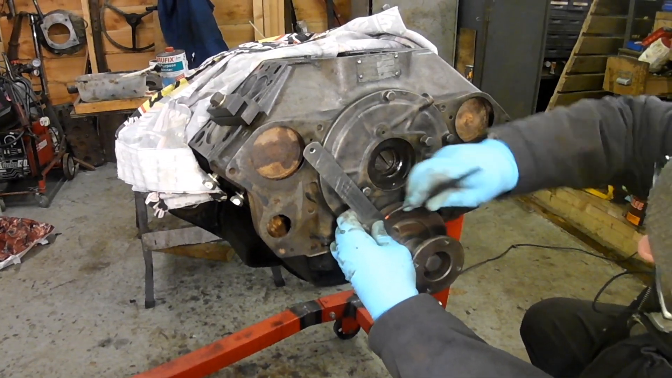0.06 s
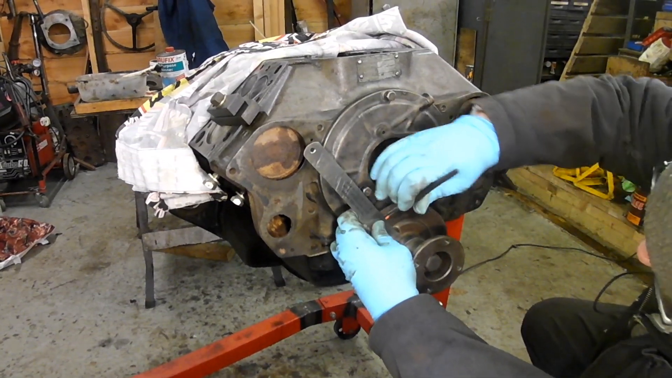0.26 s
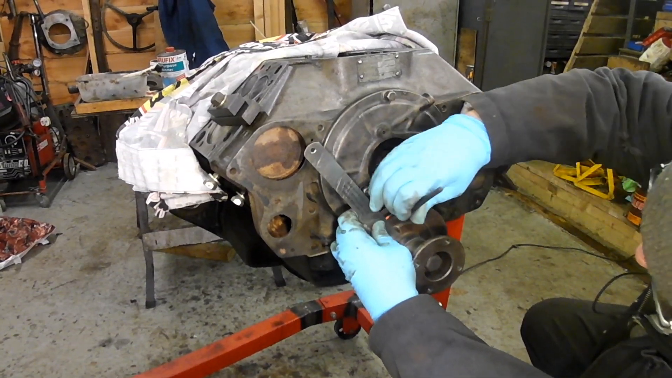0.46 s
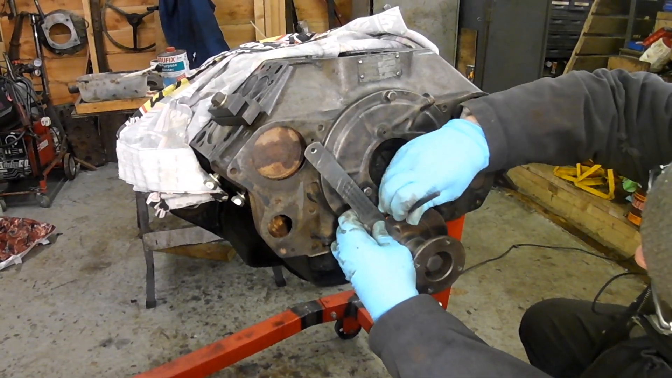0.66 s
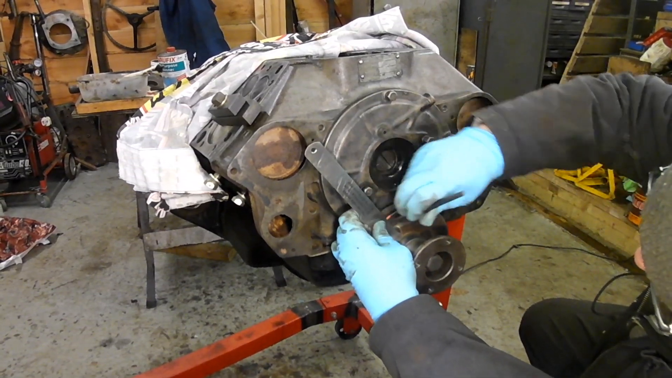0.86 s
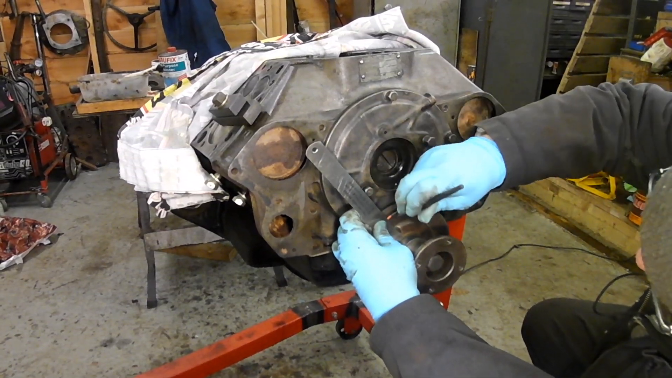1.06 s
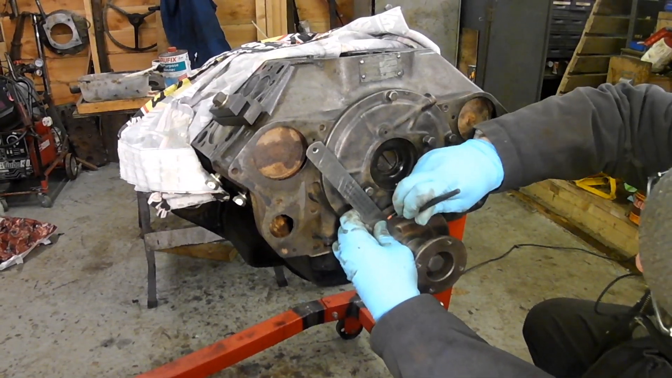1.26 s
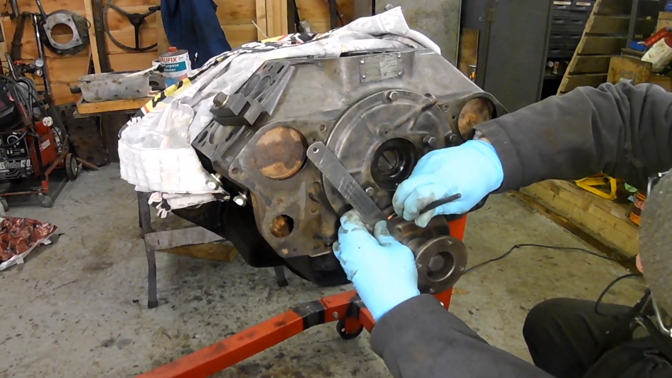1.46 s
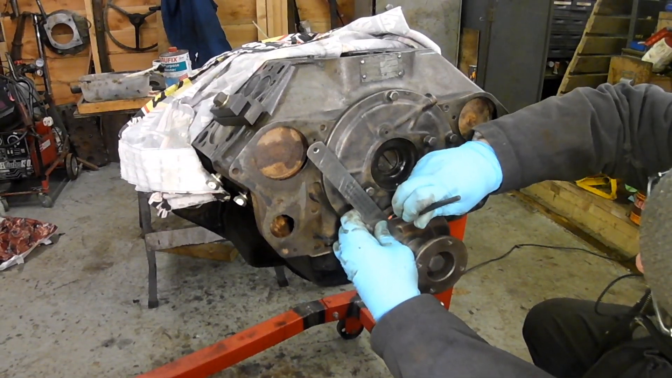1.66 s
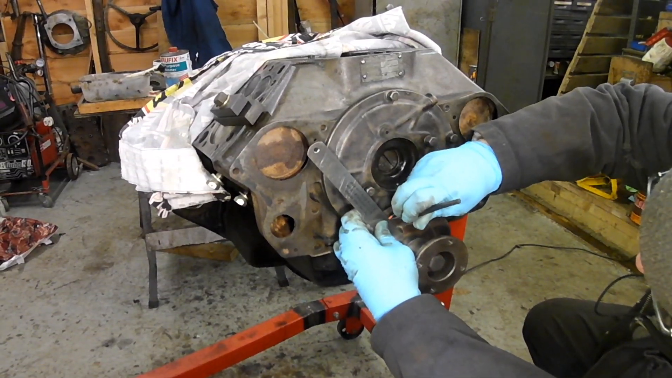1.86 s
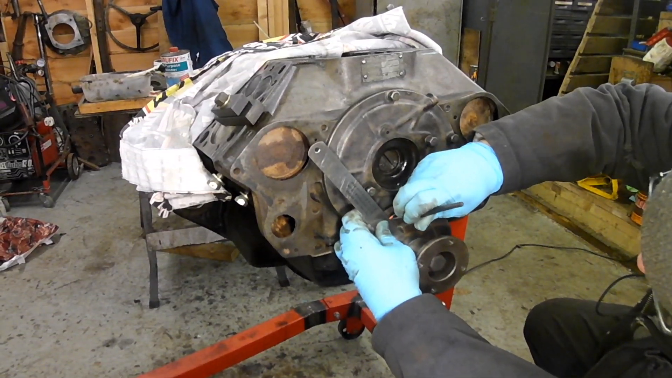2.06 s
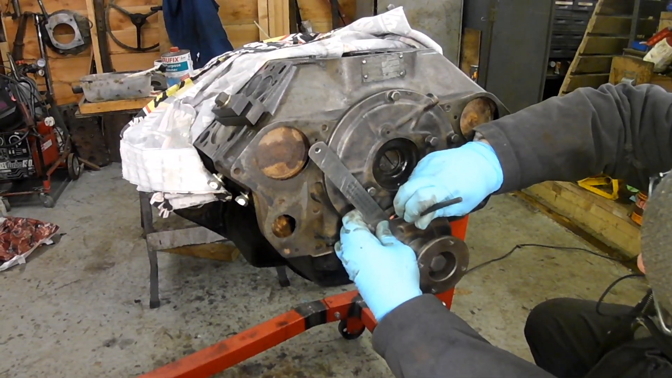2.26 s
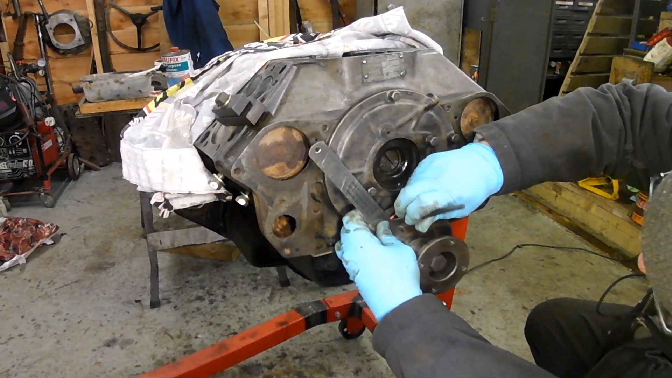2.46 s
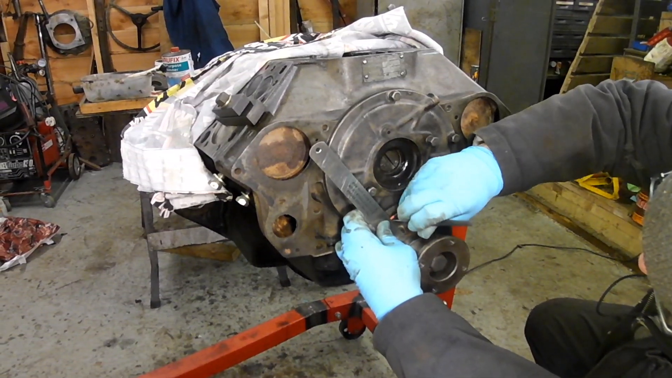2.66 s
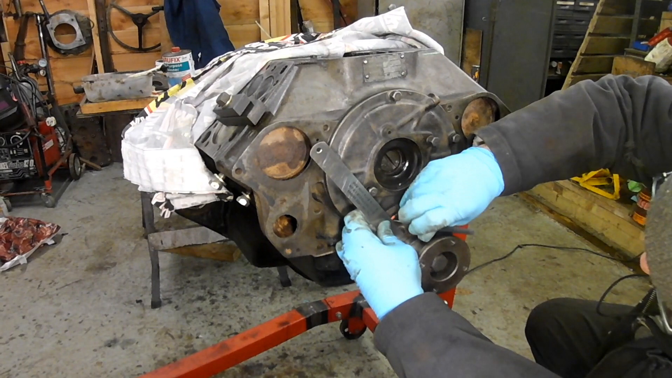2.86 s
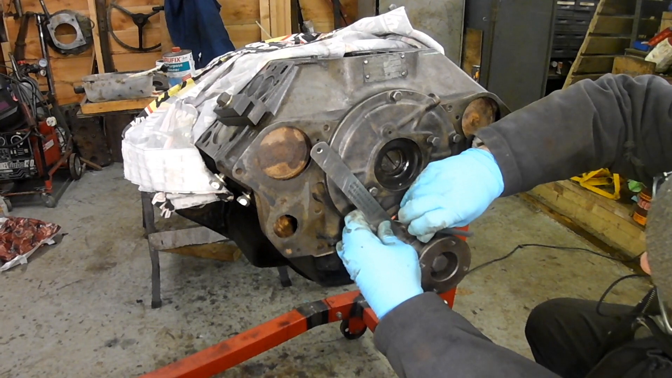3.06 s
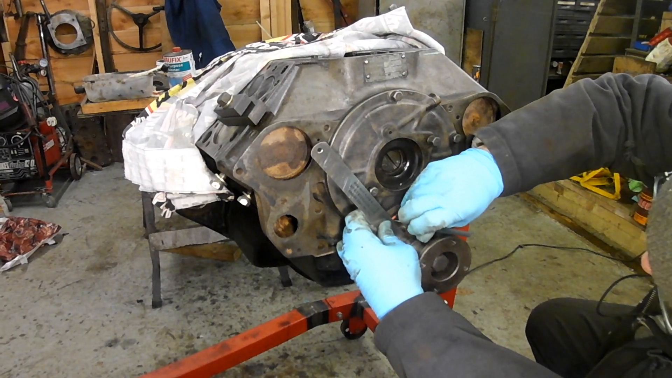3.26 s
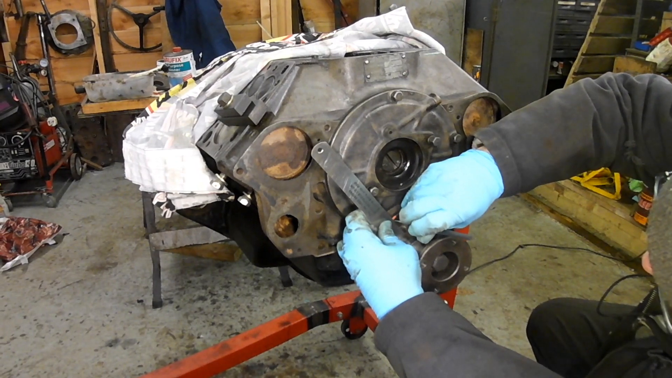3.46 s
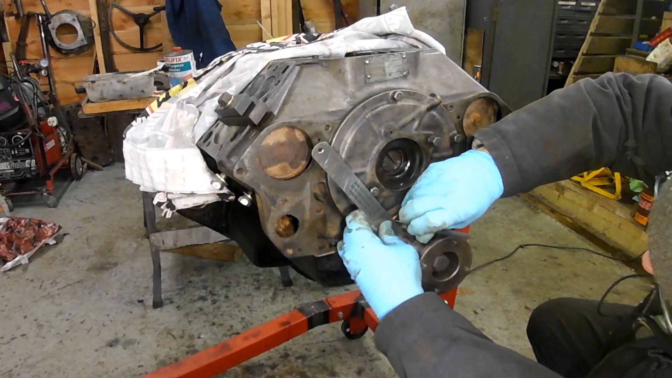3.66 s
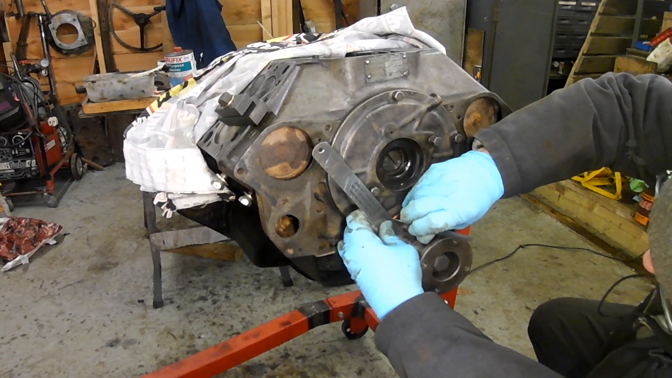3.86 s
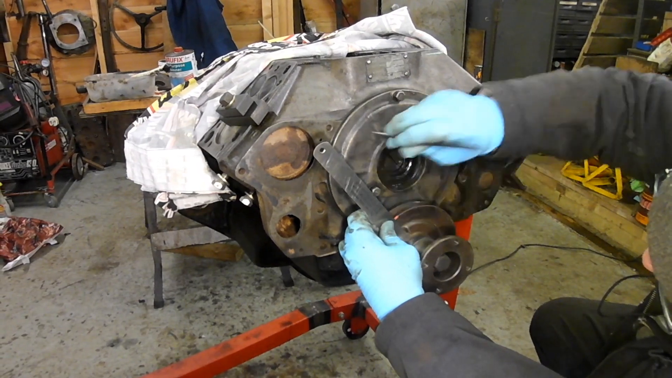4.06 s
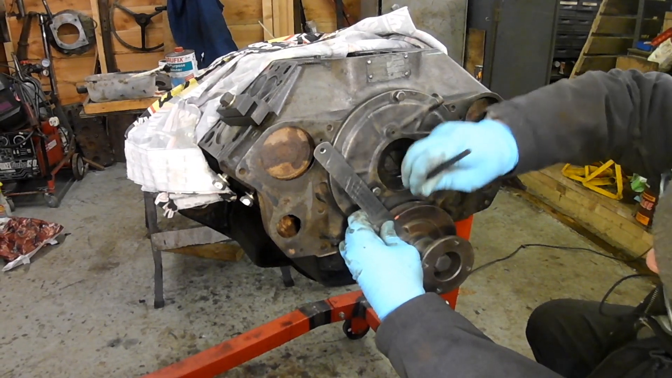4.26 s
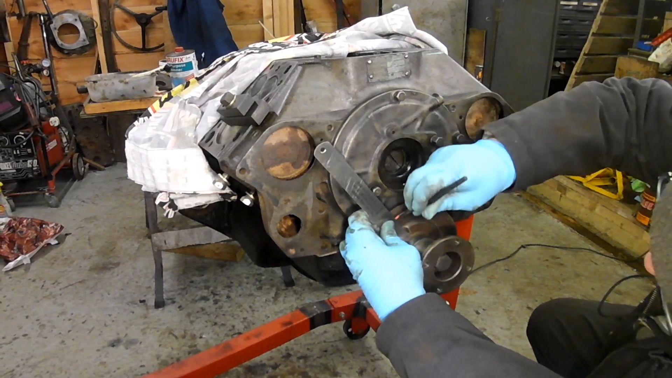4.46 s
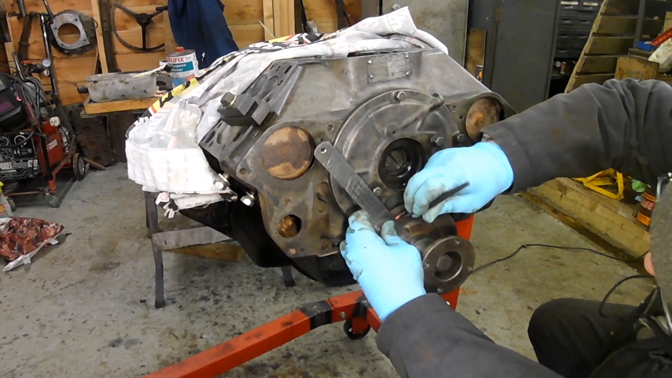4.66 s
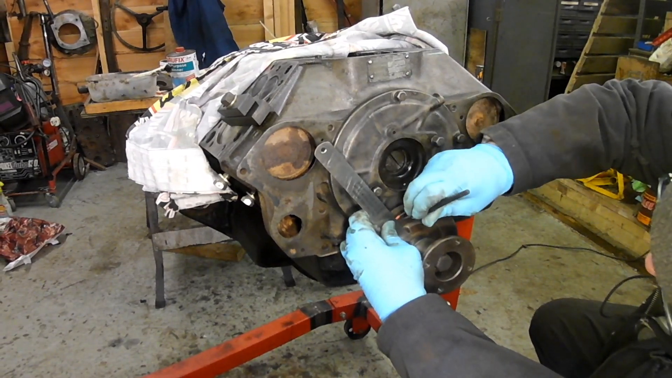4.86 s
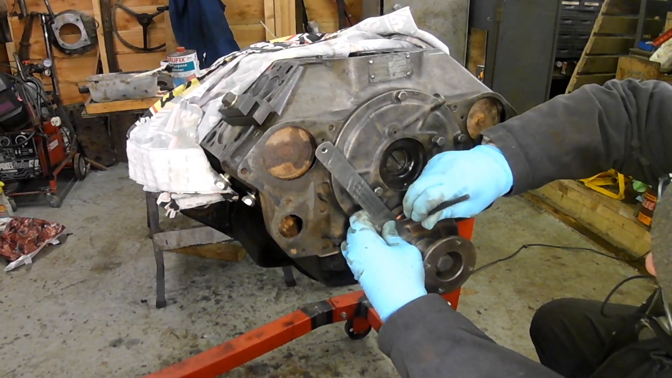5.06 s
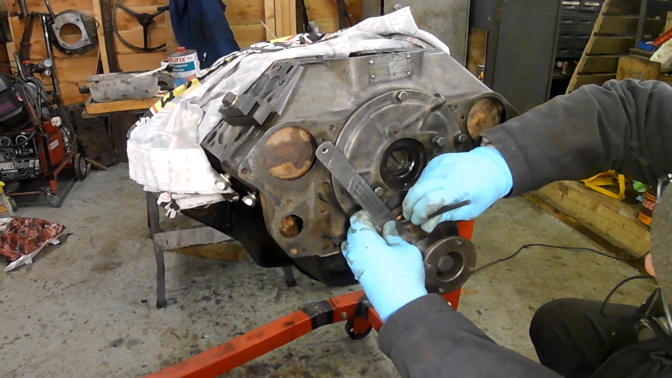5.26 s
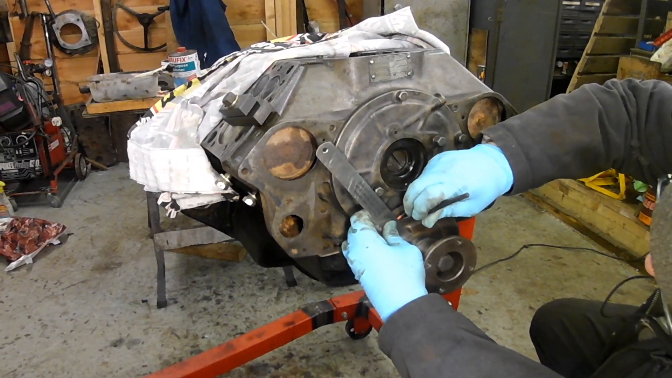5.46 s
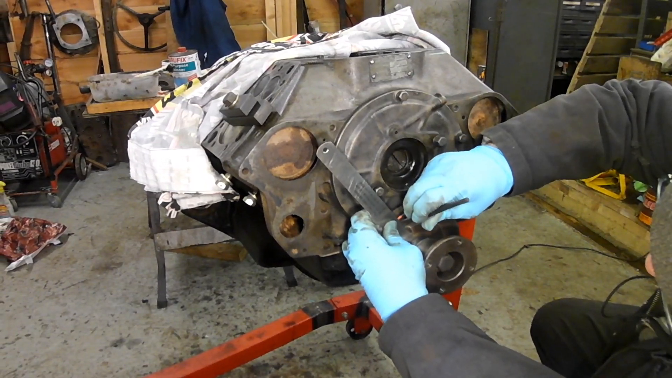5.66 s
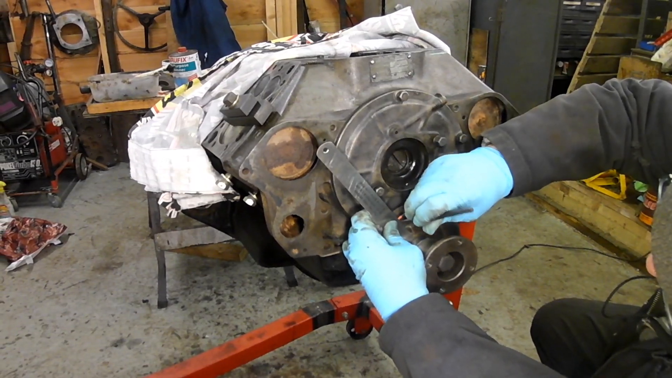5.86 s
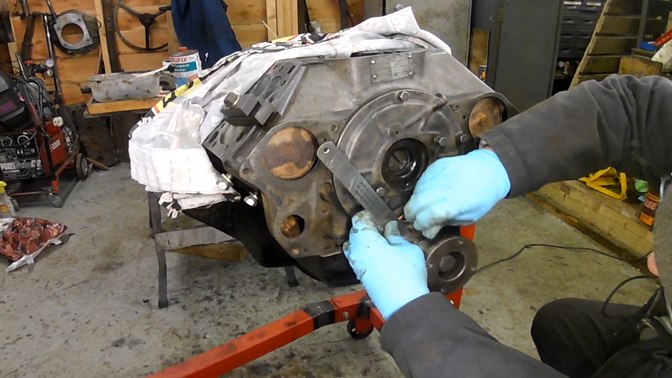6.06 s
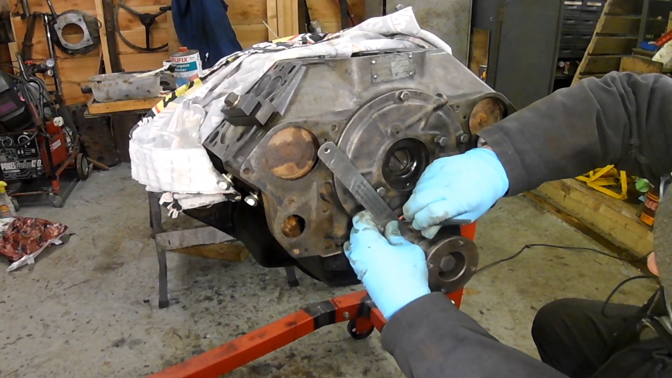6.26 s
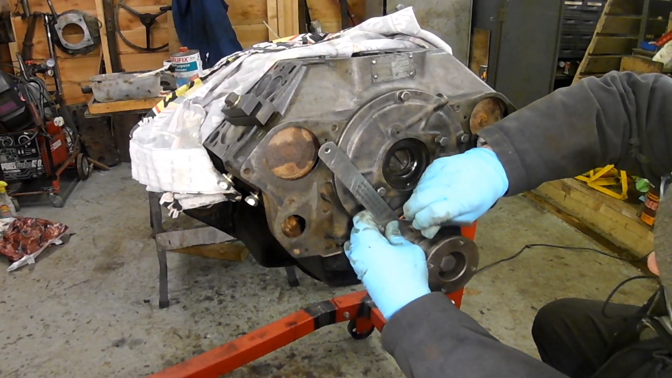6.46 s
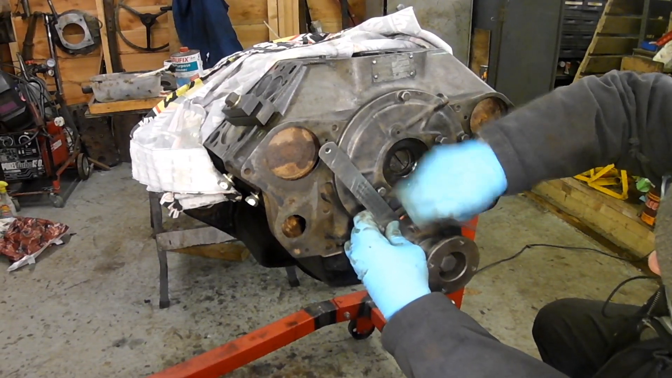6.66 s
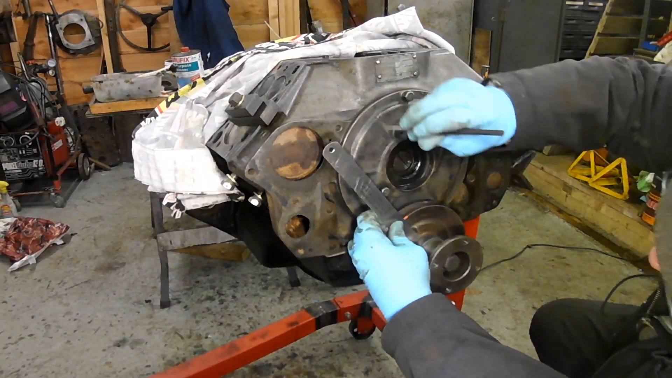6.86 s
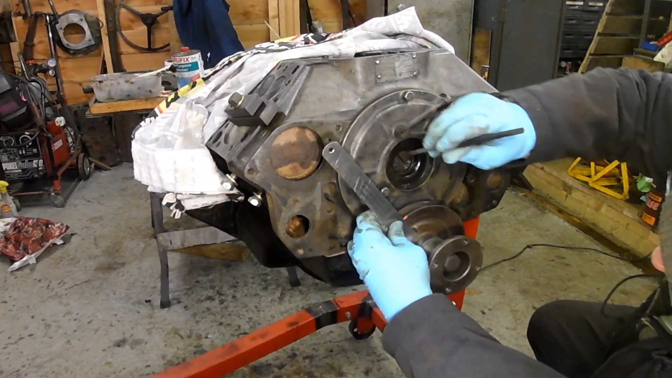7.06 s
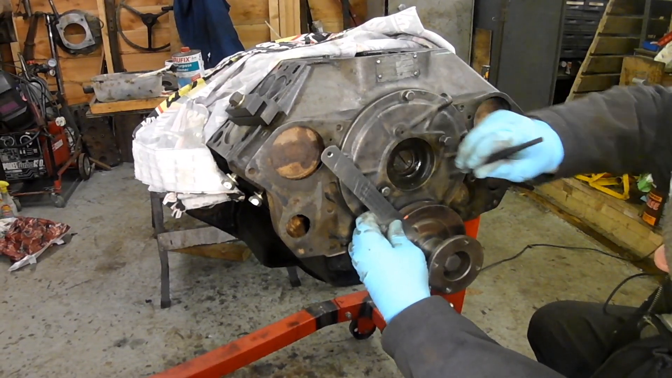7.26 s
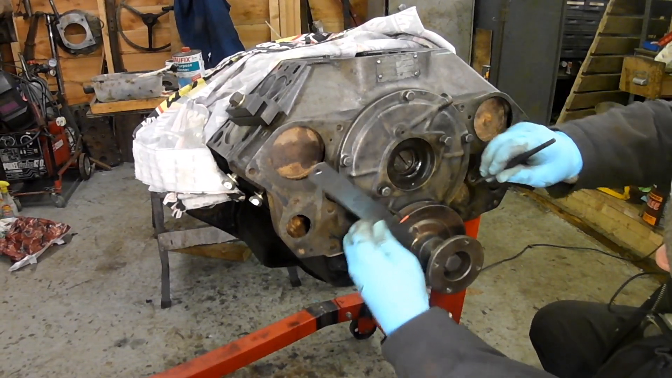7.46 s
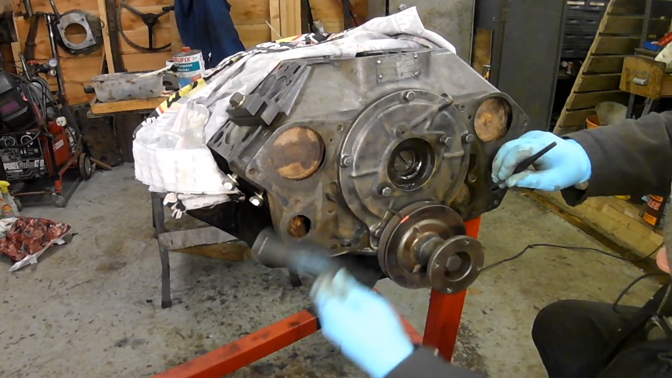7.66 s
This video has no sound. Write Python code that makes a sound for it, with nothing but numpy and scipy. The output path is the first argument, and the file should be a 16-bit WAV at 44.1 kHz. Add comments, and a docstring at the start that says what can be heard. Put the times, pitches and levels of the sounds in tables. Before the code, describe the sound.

A quiet small workshop, heard close, with barely audible low room air. From 0 to 1.7 seconds a steel tip makes two thin, high, faint hissing strokes along an engine pulley, with a little scratchy chatter near 0.8 and low sleeve rustle. From 2 to 3 seconds there are soft glove brushes and tiny ticks. A firmer scrape swells from 3 towards 4 seconds; a click at 3.8 leads to a loud, bright steel snap at 3.98, with short ringing, a muffled arm jerk and flapping sleeve. Cloth settles until about 5; small ticks come near 5.25, then another hissing stroke swells from 5.4 to 6.5. A crisp double click at 6.46 precedes a second sharp snap at 6.7 with a soft thud. Faint rubber squeaks follow near 6.9, then light scratches, tiny ticks and rustling until about 7.7.

```python
"""A steel pointer, held in gloved hands, scribes a mark on an engine pulley in a quiet workshop.
The sliding tip hisses and chatters through its resonances; sharp contacts ring the pointer and the pulley.
Twice the tip snaps off the edge and the arm jerks: a thud, a push of air and a flapping sleeve.
Sleeves rustle and rub, rubber gloves brush and squeak, and the small room answers the steel."""
import sys
import numpy as np
from scipy import signal
from scipy.fft import rfft, irfft, next_fast_len
from scipy.io import wavfile
from scipy.ndimage import map_coordinates

SR = 44100
rng = np.random.default_rng(int(sys.argv[2]) if len(sys.argv) > 2 else 0)


def digitize_waveform(pressure):
    """Quantize a signal to 16-bit integers and store it at the path in sys.argv[1].

    Rows of a 2-D input are taken as channels; values are limited to [-1, 1].
    """
    field = np.atleast_2d(pressure).T
    bounded = np.clip(field, -1, 1)
    quanta = np.round(bounded * 32767).astype(np.int16)
    wavfile.write(sys.argv[1], SR, quanta)


N = 340011

# All levels below are relative; later gains and filters set the final loudness.
# Strokes of steel along the pulley. Each row: start in seconds, firmest pressure in seconds,
# end in seconds, hiss level in dB, swell from the ends to the firmest pressure in dB.
STROKES = [(0, .25, 0.59, -66.5, 12), (.62, 1.1, 1.7, -67.5, 10), (2.983, 3.527, 3.99, -63.5, 13.5),
           (5.42, 6.125, 6.48, -62, 14)]
# Sharp contacts of the tip. Each row: time in seconds, level in dB, boost of the pinned-tip mode in dB,
# hardness (boost of the high modes) in dB, pulley ring in dB.
CLICKS = [(3.8055, -23.5, 15.5, -14, 2), (3.9227, -42, 19.5, -11.5, 9), (3.9762, -13, 6, 1.5, -2.5),
          (5.2455, -48.5, 27.5, 6, 3), (5.2777, -50, 28, 18, 10), (6.4555, -29.5, 15, 1, -25),
          (6.4599, -26, 6, -17, 2.5), (6.6961, -12.5, 0.5, 4.5, 2), (7.3274, -46.5, 19, 22.5, -1),
          (7.3677, -51, 17, 17, -9)]
# Short skids of the tip. Each row: peak time in seconds, level in dB, length (rise plus fall constants)
# in seconds, pitch of the main tip resonance in Hz.
SKIDS = [(0.731, -52, 0.013, 5130), (0.743, -46.5, 0.012, 5100), (0.749, -54, 0.005, 5000),
         (0.806, -52, .005, 5100), (.813, -44, 0.0068, 5400), (0.817, -42.5, 0.009, 5350),
         (2.178, -54.5, 0.0051, 4320), (2.624, -63.5, .008, 5150), (2.907, -54.5, .0025, 4900),
         (3.8031, -32.5, 0.0062, 5050), (5.121, -59.5, .009, 5150), (5.22, -64.5, 0.033, 5260),
         (5.2465, -46, 0.0043, 5200), (5.293, -51.5, 0.015, 5270), (6.456, -25, 0.007, 5180),
         (7.252, -56.5, 0.04, 5150), (7.321, -53, 0.023, 4660)]
# Gloves brushing the parts. Each row: peak time in seconds, level in dB, rise constant in seconds.
BRUSHES = [(.158, -66, .008), (.812, -56.5, 0.045), (1.303, -56, 0.0037), (1.436, -56, .001),
           (2.076, -56, .003), (2.136, -54.5, 0.028), (2.314, -58, .0015), (2.708, -59.5, 0.0014),
           (2.746, -55.5, 0.024), (3.352, -55, 0.026), (4.341, -56, .003), (4.634, -58, .004),
           (5.283, -53, 0.021), (5.351, -61, .004), (7.371, -54, 0.0033)]
# Jerks of the arm when the tip slips off. Each row: time in seconds, thud level in dB,
# air push level in dB, sleeve flap level in dB.
JERKS = [(3.978, -62, -50.5, -52), (6.696, -43, -44.5, -47.5)]
# Ringing modes of the hand-damped pointer. Each row: pitch in Hz, level in dB,
# time to fall by 60 dB in seconds, before the pinning of a contact changes it.
POINTER_MODES = [(1250, -27.5, 0.033), (1590, -14, 0.013), (3450, -9, 0.013), (3983, 1, 0.025),
                 (4160, -2, 0.022), (4700, -10, 0.018), (5220, -10, 0.03), (8080, -23, 0.0076),
                 (10880, -15.5, 0.022), (11420, -8, 0.013), (12200, -11, .011), (14100, -9, .009),
                 (14700, -24.5, .008)]
# Ringing modes of the pulley and its hub. Each row: pitch in Hz, level in dB,
# time to fall by 60 dB in seconds when no tip presses on it.
PULLEY_MODES = [(668, -43, .5), (830, -42, .1), (1130, -39, .1), (1281, -38, .2), (1497, -35, .33),
                (1580, -39, .22), (1633, -40, .26), (3149, -24, .2), (3450, -34, .2), (3536, -35, .22),
                (3560, -37, .22), (3615, -36, .22), (3722, -37, .22), (3821, -30, .26), (3954, -24, .19),
                (4161, -34, .12), (4651, -35, .18), (5600, -38, .14)]
# Colour of the crack at each contact. Each row: frequency in Hz, level in dB.
CRACK_COLOUR = [(100, 0), (500, -24), (1300, 11), (2300, -19), (3200, 9), (4000, -35.5), (5500, 3.5),
                (7000, -4.5), (8400, -0.5), (9800, -10), (11400, -27), (13000, -17.5), (14200, 3),
                (16000, -32)]
# Colour of rubber gloves on metal. Each row: frequency in Hz, level in dB.
GLOVE_COLOUR = [(60, 4), (150, 4.5), (500, 0), (1400, -2), (2500, -12), (4500, -19.5), (8000, -19),
                (15000, -25)]
# Colour of the sleeve's low rustle. Each row: frequency in Hz, level in dB.
SLEEVE_COLOUR = [(25, -33.5), (60, -7.5), (110, 0.5), (200, -2.5), (320, -5.5), (500, -11), (1000, -17),
                 (2000, -34.5), (5000, -35)]
# Colour of cloth rubbing. Each row: frequency in Hz, level in dB.
CLOTH_COLOUR = [(200, -31), (600, 3.5), (1300, 2), (2400, 1), (3600, -1.5), (4900, 1.5), (7000, -7),
                (10000, -9.5), (15500, -13.5)]
# Colour of a jerked, flapping sleeve. Each row: frequency in Hz, level in dB.
FLAP_COLOUR = [(40, -18), (110, -23), (220, -2), (320, -5), (600, -18), (2000, -38.5), (6000, -57)]
# Colour of the still air in the shop. Each row: frequency in Hz, level in dB.
QUIET_COLOUR = [(20, -8), (40, -1.5), (75, 4), (120, -9.5), (180, -20.5), (300, -26), (650, -10),
                (1200, -14.5), (2500, -17.5), (6000, -23), (15800, -27)]
# Resonances of the tip sliding on steel. Each row: centre in Hz, width in Hz before the response is
# squared to steepen its sides, level in dB.
TIP_RESONANCES = [(5220, 480, 0), (4850, 500, -9), (6750, 1100, -16), (10950, 800, -11), (11550, 700, -14)]
# How long the room's answer lasts. Each row: frequency in Hz, time to fall by 60 dB in seconds.
ROOM_DECAY = [(100, .45), (600, 0.84), (1500, 0.66), (4000, 0.18), (8000, 0.54), (15000, 0.41)]
# Rubber squeaks of a glove. Each row: start in seconds, length in seconds, start pitch in Hz,
# end pitch in Hz, level in dB.
SQUEAKS = [(6.874, .058, 3080, 2480, -63), (6.955, .09, 2550, 2750, -68)]
# Colour of what a contact spreads into the room. Each row: frequency in Hz, level in dB.
SPREAD_COLOUR = [(200, -23.5), (800, 10.5), (1400, -3), (2200, 0.5), (3000, 2), (3800, -23), (5500, -14),
                 (7000, -11), (9800, -8.5), (11500, -6.5), (13000, -12), (15500, -24)]
# Colour of the casting's crowd of close modes. Each row: frequency in Hz, level in dB.
CASTING_COLOUR = [(500, -9.5), (800, -6.5), (1100, -18.5), (1550, -2), (2100, -26.5), (2900, -11.5),
                  (3350, -9.5), (3650, 2.5), (4100, -4), (4400, -3.5), (5000, -11), (6200, -13.5),
                  (8000, -23), (15000, -34)]
# Sweeps of an arm. Each row: time in seconds when full strength is reached, length held in seconds,
# sleeve flapping level in dB, cloth rubbing level in dB.
SWEEPS = [(0.169, 0.24, -53, -65.5), (0.872, 0.081, -56, -70), (2.906, 0.42, -65, -78.5),
          (3.485, 0.032, -60, -76), (3.755, 0.54, -58, -70), (4.447, 0.27, -64.5, -75.5),
          (5.762, 0.019, -63, -72.5), (5.968, 0.26, -60, -71.5), (6.545, 0.026, -57.5, -66.5),
          (6.944, 0.14, -56, -67), (7.212, 0.29, -57, -67.5), (7.687, .02, -57.5, -74)]

TOP_HZ = 15850  # upper limit of the sound
SWEEP_ATTACK_S, SWEEP_RELEASE_S = 0.11, 0.13  # the cloth gathers speed, then settles
TUG_ATTACK_S, TUG_RELEASE_S = .018, 0.15  # every brush of a glove tugs the sleeve
SKID_RISE = 0.3  # share of a skid spent building up
BRUSH_FALL_S = 0.013  # the rubber lets go quickly
LEAN_DB_PER_S = 401  # the longer a skid, the harder the tip leans on the pulley's low modes


def amp(db):
    """Turn decibels into gain."""
    return 10 ** (np.asarray(db) / 20)


def unit(x):
    """Scale to an rms (average strength) of 1."""
    return x / np.sqrt(np.mean(x ** 2) + 1e-20)


def along(points, hz):
    """Read a curve of (Hz, value) points on a log frequency axis."""
    f, v = np.transpose(points)
    return np.interp(np.log(hz + 1), np.log(f + 1), v)


def clock():
    """The time of every sample, in seconds."""
    return np.arange(N) / SR


def wobble(rate):
    """A random curve of straight segments, with rate new values a second."""
    values = rng.standard_normal(int(N * rate / SR) + 4)
    return map_coordinates(values, [np.arange(N) * rate / SR], order=1)


def filtered(x, response):
    """Shape a sound by a response that depends on frequency."""
    size = next_fast_len(len(x) + 8192)
    spectrum = rfft(x, size) * response(np.fft.rfftfreq(size, 1 / SR))
    return irfft(spectrum, size)[:len(x)]


def noise(colour):
    """Noise of rms 1 with the given colour."""
    return unit(filtered(rng.standard_normal(N), lambda hz: amp(along(colour, hz))))


def add(track, s, sound):
    """Mix a sound into the track from time s."""
    part = track[max(round(s * SR), 0):][:len(sound)]
    part += sound[:len(part)]


def swell(t, rise, fall):
    """An envelope that peaks at t = 0, with exponential sides."""
    return np.exp(np.minimum(t / rise, -t / fall))


def held(t, length, attack, release):
    """An envelope that swells up to t = 0, holds for length and dies away."""
    return np.exp(np.minimum(0, np.minimum(t / attack, (length - t) / release)))


def resonance(hz, centre, width):
    """The response of one damped mode, strongest at its centre frequency."""
    return 1j * hz * width / (centre ** 2 - hz * hz + 1j * hz * width)


def friction(size, shift, grain_db, broad_db, width=1):
    """Tiny catches of the tip on rough steel excite its steep-sided resonances."""
    catches = rng.standard_normal(size) * amp(grain_db * rng.standard_normal(size))

    def response(hz):
        power = amp(broad_db) ** 2
        for centre, mode_width, db in TIP_RESONANCES:
            mode = abs(resonance(hz, centre * shift, mode_width * width))
            power = power + (amp(db) * mode ** 2) ** 2
        return np.sqrt(power)

    return unit(filtered(catches, response))


def stroking():
    """Drag of the tip, as a gain: each stroke starts and ends at rest and swells with pressure."""
    t = clock()
    drag = np.zeros(N)
    for start, peak, end, db, swell_db in STROKES:
        progress = np.clip((t - start) / (end - start), 0, 1)
        speed = np.sqrt(abs(np.sin(np.pi * progress)))
        slack = np.interp(t, [start, peak, end], [1, 0, 1])
        drag += speed * amp(db - swell_db * slack)
    return drag


def scribing(level_db=1, waver_db=0.0):
    """Friction makes the tip hiss while it is drawn along the pulley."""
    hiss = friction(N, 1, grain_db=6, broad_db=-28)
    return stroking() * amp(level_db + waver_db * wobble(60)) * hiss


def cloth_motion(sweep_db, rest_db, tug_db, stroke_db):
    """Resting arms, sweeps, glove tugs and scribing strokes add their power in the cloth."""
    t = clock()
    parts = [amp(rest_db), amp(stroke_db) * stroking()]
    for (s, length, *_), db in zip(SWEEPS, sweep_db):
        parts.append(amp(db) * held(t - s, length, SWEEP_ATTACK_S, SWEEP_RELEASE_S))
    for s, db, _ in BRUSHES:
        parts.append(amp(db + tug_db) * swell(t - s, TUG_ATTACK_S, TUG_RELEASE_S))
    return np.sqrt(sum(part ** 2 for part in parts))


def sleeves(flap_db=0, rub_db=4, fold_db=1, grain_db=1.5):
    """Heavy cloth folds with a low rustle and rubs with a fine hiss."""
    _, _, flap_levels, rub_levels = np.transpose(SWEEPS)
    flapping = cloth_motion(flap_levels, rest_db=-68, tug_db=-5.0, stroke_db=-7.5)
    rubbing = cloth_motion(rub_levels, rest_db=-82.5, tug_db=-15.0, stroke_db=-8.5)
    folds = flapping * amp(flap_db + fold_db * wobble(35)) * noise(SLEEVE_COLOUR)
    weave = rubbing * amp(rub_db + grain_db * wobble(250)) * noise(CLOTH_COLOUR)
    return folds + weave


def gloves(grain_db=0.5):
    """Rubber drags over the metal in short, grainy brushes."""
    t = clock()
    touch = sum(amp(db) * swell(t - s, rise, BRUSH_FALL_S) for s, db, rise in BRUSHES)
    return touch * unit(noise(GLOVE_COLOUR) * amp(grain_db * wobble(330)))


def body(hz, low_db):
    """A firm push reaches the low modes of the pulley: dB at each frequency."""
    return low_db * along([(800, .3), (1450, 1), (1700, 1), (3000, 0)], hz)


def pressed_pulley(hz, lean_db, damping):
    """Response of the pulley under the tip, whose pressure damps its modes and so widens them."""
    total = 0
    for centre, level, t60 in PULLEY_MODES:
        width = damping * np.log(1000) / np.pi / t60
        total = total + amp(level / 2 + body(centre, lean_db)) * resonance(hz, centre, width)
    return total


def skids(dull_db=-10, damping=1.8, ring_db=22.0, low_db=-1):
    """The tip chatters briefly, at a pitch set by the grip, and shakes the pulley it presses on."""
    out = np.zeros(N)
    t = np.arange(SR // 4) / SR - 1 / 8
    for s, db, length, hz in SKIDS:
        force = amp(db) * swell(t, SKID_RISE * length, (1 - SKID_RISE) * length)
        shift = hz / TIP_RESONANCES[0][0]
        chatter = force * friction(len(t), shift, grain_db=5, broad_db=-32.5, width=.75)
        add(out, s + t[0], filtered(chatter, lambda f: amp(along([(5600, 0), (6400, dull_db)], f))))
        lean_db = low_db + LEAN_DB_PER_S * length
        shaking = force * rng.standard_normal(len(t))
        pulley = filtered(shaking, lambda f: pressed_pulley(f, lean_db, damping))
        add(out, s + t[0], amp(ring_db) * pulley)
    return out


def ring(t, hz, db, t60):
    """One struck mode: a sine that dies away, its level varying slightly at random."""
    return amp(db + rng.normal(0, 0.17) - 60 * t / t60) * np.sin(2 * np.pi * hz * t)


def pointer_ring(t, pinned_db, hard_db, grip=0.22):
    """A pinned tip favours its own mode and stops ringing sooner; a hard blow reaches high modes."""
    colour = [(4600, 0), (5000, pinned_db), (5500, pinned_db), (7000, hard_db), (10000, hard_db)]
    life = amp(-grip * pinned_db)
    total = np.zeros(len(t))
    for k, (hz, level, t60) in enumerate(POINTER_MODES):
        total += (-1) ** k * ring(t, hz, level + along(colour, hz), t60 * life)
    return total


def pulley_ring(t, pinned_db, hard_db, push=0.245, reach=0.52,
                casting_db=-26, casting_t60=0.38, crowd_reach=.3):
    """The pulley's separate modes ring along with a crowd of close modes in the casting."""
    soft_db = min(hard_db, 0)  # a soft contact leaves the upper modes quiet

    def weight(hz):
        return body(hz, push * pinned_db) + reach * along([(3200, 0), (3450, soft_db)], hz)

    modes = np.zeros(len(t))
    for hz, level, t60 in PULLEY_MODES:
        modes += rng.choice([-1, 1]) * ring(t, hz, level + weight(hz), t60)
    crowd = unit(filtered(rng.standard_normal(len(t)), lambda f: amp(along(CASTING_COLOUR, f))))
    crowd = filtered(crowd, lambda f: amp(weight(f)))
    return modes + amp(casting_db + crowd_reach * soft_db - 60 * t / casting_t60) * crowd


def clicks(attack=0.00081, ring_attack=0.0017, crack_db=-13, crack_rise=.0005, crack_fall=0.0045,
           crack_lag=0.00066, spread_db=0, grit=0.064):
    """Contacts crack and ring both steel parts: (direct sound, sound spread into the room)."""
    out, cracks = np.zeros(N), np.zeros(N)
    t = np.arange(SR // 2) / SR
    for s, db, pinned_db, hard_db, pulley_db in CLICKS:
        pointer = pointer_ring(t, pinned_db, hard_db) * (1 - np.exp(-t / attack))
        pulley = pulley_ring(t, pinned_db, hard_db) * (1 - np.exp(-t / ring_attack))
        add(out, s, amp(db) * (pointer + amp(pulley_db) * pulley))
        # a tip that stays on the metal grates more
        crack = amp(db + grit * pinned_db + crack_db) * swell(t - crack_lag, crack_rise, crack_fall)
        add(cracks, s, crack)
    return out + cracks * noise(CRACK_COLOUR), amp(spread_db) * cracks * noise(SPREAD_COLOUR)


def jerks(thud_hz=105, thud_fall=0.01, air_hz=28, air_lag=.04, air_fall=0.043,
          flap_lag=0.018, flap_fall=0.13):
    """The freed hand thuds; then the sleeve flaps and pushes the air."""
    out, flap = np.zeros(N), np.zeros(N)
    t = np.arange(SR // 2) / SR
    for s, thud_db, air_db, flap_db in JERKS:
        thud = amp(thud_db) * swell(t - .005, .003, thud_fall) * np.sin(2 * np.pi * thud_hz * t)
        air = amp(air_db) * swell(t - air_lag, 0.025, air_fall) * np.sin(2 * np.pi * air_hz * t)
        add(out, s, thud + air)
        add(flap, s, amp(flap_db) * swell(t - flap_lag, 0.017, flap_fall))
    return out + flap * noise(FLAP_COLOUR)


def squeaks(jitter=0.03):
    """Rubber sticks and slips at a gliding, unsteady rate."""
    out = np.zeros(N)
    for s, length, start_hz, end_hz, db in SQUEAKS:
        size = int(length * SR)
        pitch = np.linspace(start_hz, end_hz, size) * (1 + jitter * wobble(880)[:size])
        tone = np.sin(2 * np.pi * np.cumsum(pitch) / SR)
        add(out, s, amp(db) * np.sqrt(np.hanning(size)) * tone)
    return out


def workshop(x, gap=0.0021):
    """The room's answer: a tail of noise in which each frequency dies at its own speed."""
    hz, t, z = signal.stft(rng.standard_normal(SR // 2), SR, nperseg=256)
    decay = amp(-60 * t / along(ROOM_DECAY, hz)[:, None])
    tail = signal.istft(z * decay, SR, nperseg=256)[1]
    tail = tail * (1 - np.exp(-np.arange(len(tail)) / SR / gap))  # the answer builds up gradually
    return signal.fftconvolve(x, tail / np.linalg.norm(tail))[:N]


def scene(room_db=-13, treble_db=-16, quiet_db=-68):
    """Steel, gloves and sleeves over the still air of the shop."""
    direct, spread = clicks()
    steel = scribing() + skids() + direct
    # the hands shade the room from the pointer's highest modes
    shade = [(3800, -3.5), (5200, -6.5), (11000, treble_db)]
    shaded = filtered(steel, lambda hz: amp(along(shade, hz)))
    room = amp(room_db) * workshop(shaded + spread)
    hands = sleeves() + gloves() + jerks() + squeaks()
    still_air = amp(quiet_db) * noise(QUIET_COLOUR)
    return (steel + room + hands + still_air)[None]


def record(dry):
    """A steep filter removes what lies above the upper limit."""
    return np.array([filtered(channel, lambda hz: 1 / (1 + (hz / TOP_HZ) ** 200)) for channel in dry])


dry = scene()
out = record(dry)
digitize_waveform(out)
```